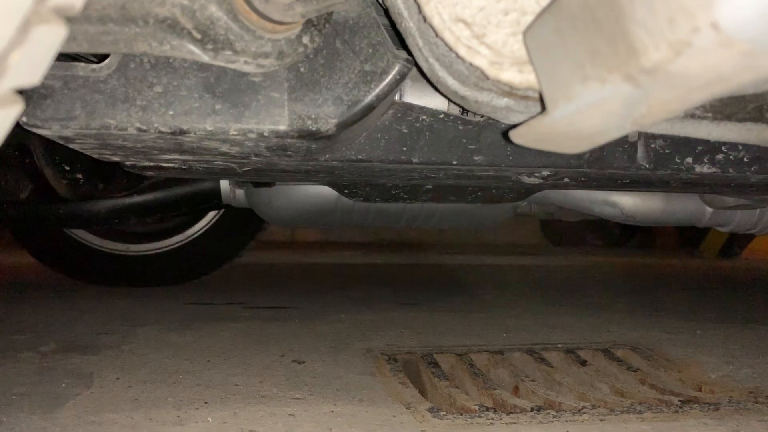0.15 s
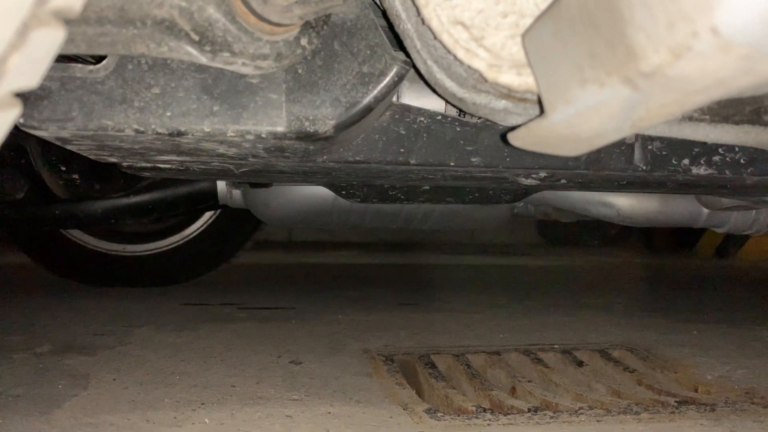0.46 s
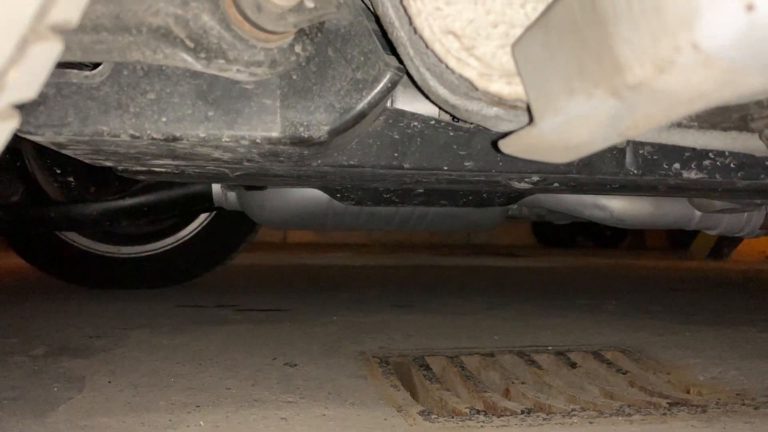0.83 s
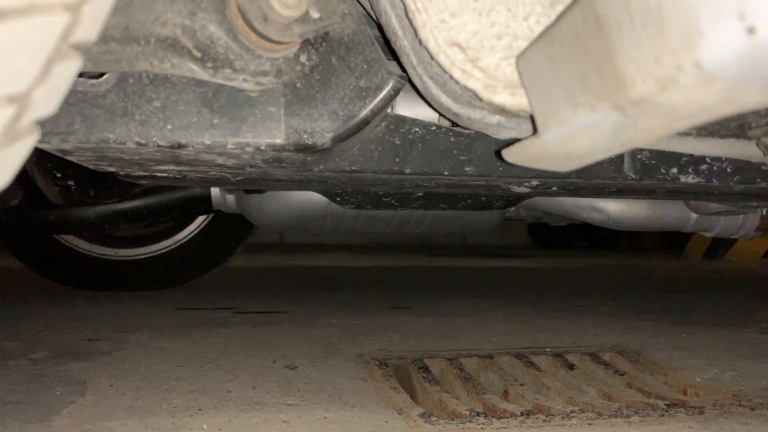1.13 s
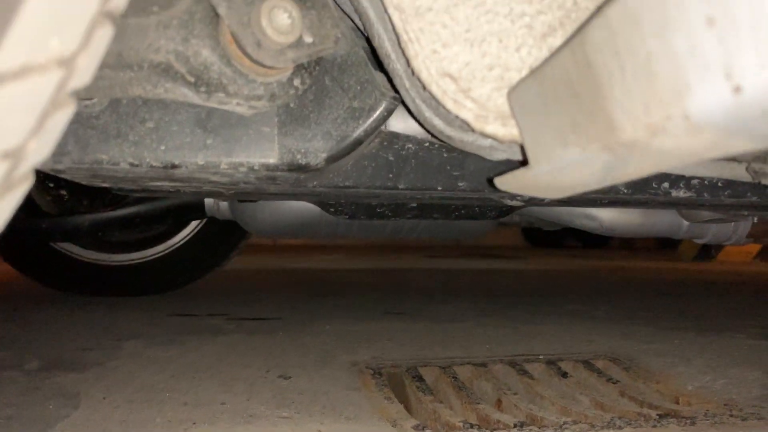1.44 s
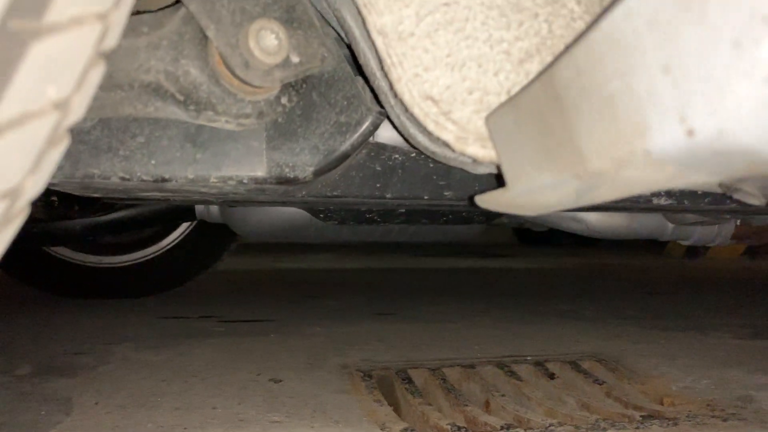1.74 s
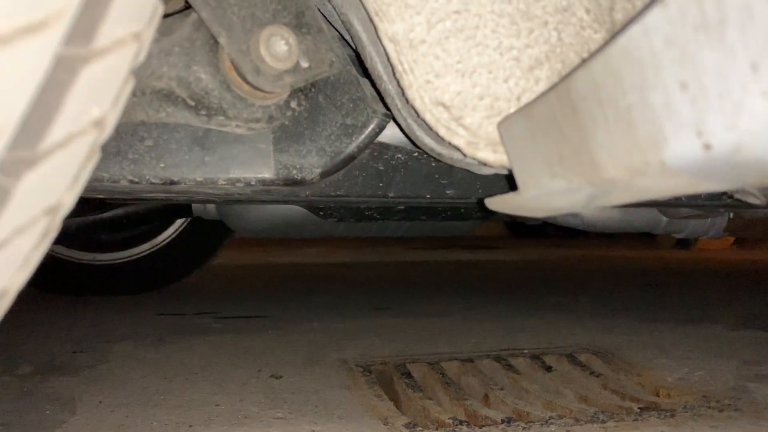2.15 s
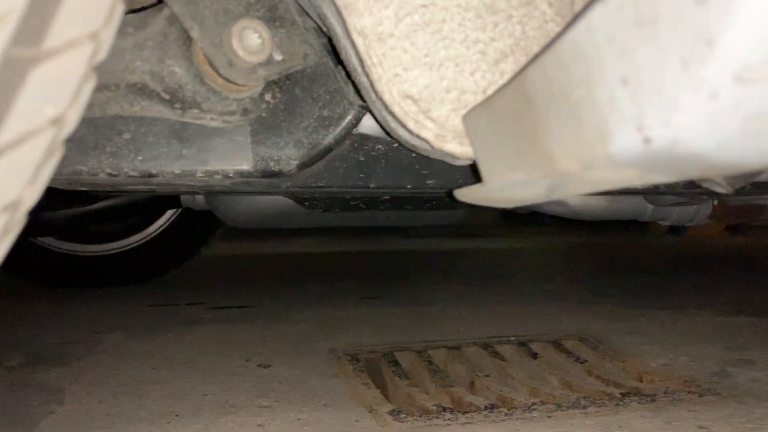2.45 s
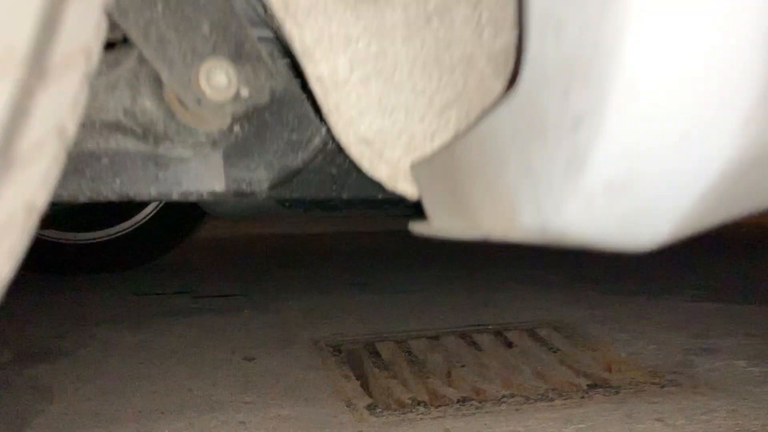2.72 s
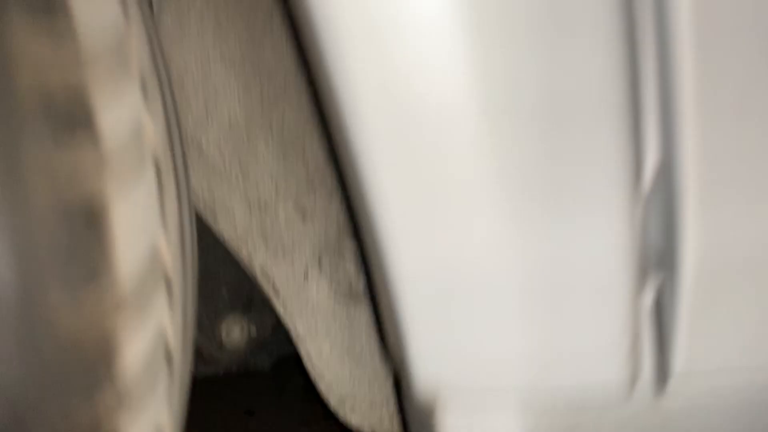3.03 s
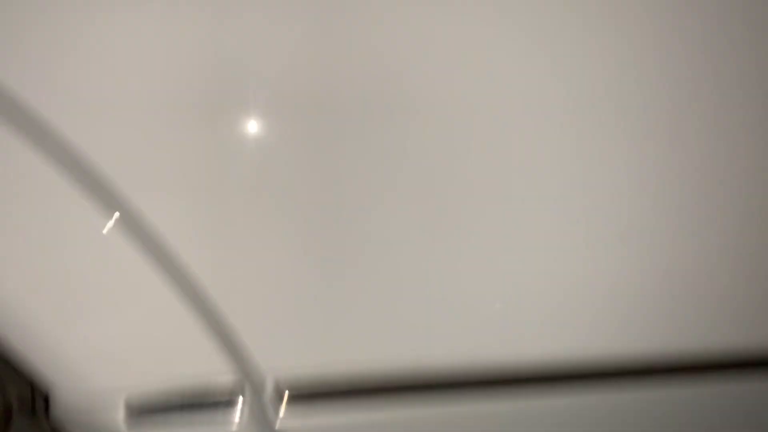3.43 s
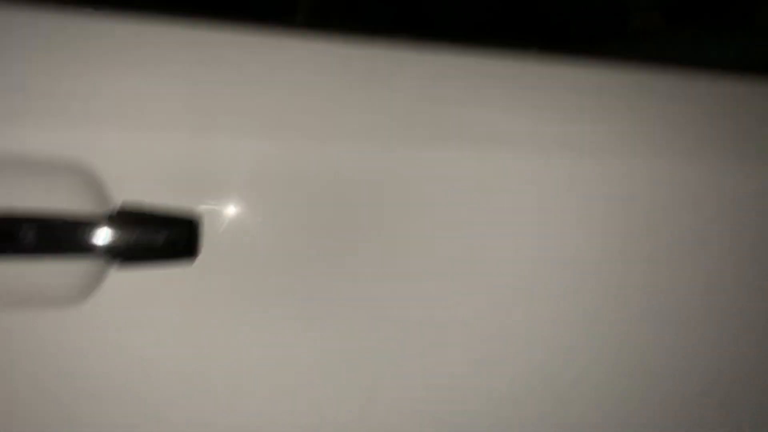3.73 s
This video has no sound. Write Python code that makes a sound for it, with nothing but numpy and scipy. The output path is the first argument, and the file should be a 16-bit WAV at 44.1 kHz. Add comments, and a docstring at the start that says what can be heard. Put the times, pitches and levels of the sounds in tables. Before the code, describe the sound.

A parked car's engine drones deep and steady with pump whine and hiss, dulling near the end

```python
"""In a garage a parked car runs, heard from the floor beside its wheel. A deep exhaust drone is a sum of low
engine orders; a small pump adds wavering whines, a hum and a housing ring that surges; a broad roar and
hiss are random short-time spectra. Near the end the microphone is lifted behind the body panel, which
shades hiss and pump; clothes rustle as lumpy noise, and something scuffs briefly in noise bands."""
import sys
import numpy as np
from scipy import signal
from scipy.fft import rfft, irfft
from scipy.io import wavfile
from scipy.ndimage import uniform_filter1d

SR = 44100
rng = np.random.default_rng(int(sys.argv[2]) if len(sys.argv) > 2 else 0)


def wrap_up_sound(samples):
    """Save the sound to the file named by the first command line argument, as 16-bit audio."""
    columns = np.atleast_2d(samples).T
    # keep every value between -1 and 1, then stretch to whole-number steps
    tamed = np.clip(columns, -1, 1)
    steps = np.round(tamed * 32767).astype(np.int16)
    wavfile.write(sys.argv[1], SR, steps)


def linear_from_db(decibels):
    """Turn decibels (scalar or array-like) into linear amplitude factors; 0 gives 1."""
    return 10 ** (np.asarray(decibels, float) / 20)


N = 171108
T = np.arange(N) / SR  # time axis [s]
# how far the body panel shades the microphone: (time [s], shade [1 = fully shaded])
PANEL_SHADE = [(0, 0), (1.5, 0.02), (2.5, 0.06), (2.8, 0.12), (3.08, 0.34), (3.3, 0.52), (3.42, 0.72),
               (3.6, 0.89), (3.88, 1.05)]


def evened(x):
    """Normalisation: scales to rms 1."""
    return x / np.sqrt(np.mean(abs(x) ** 2) + 1e-20)


def curve(points, t):
    """Linear interpolation between rows in time."""
    return np.interp(t, *np.transpose(points))


def read(points, hz):
    """Linear interpolation on a log-frequency axis."""
    f, value = np.transpose(points)
    return np.interp(np.log(hz + 1), np.log(f + 1), value)


def fuzzy(hz, width, n):
    """Narrow-band noise: complex noise through two equal poles, shifted up to hz; real part near rms 1."""
    r = np.exp(-np.pi * width / SR)  # each pole is width Hz wide
    z = rng.standard_normal(n + SR) + 1j * rng.standard_normal(n + SR)
    z = signal.lfilter([1], [1, -r], z)
    z = signal.lfilter([1], [1, -r], z)[SR:]  # the first second lets the poles settle
    return np.sqrt(2) * evened(z) * np.exp(2j * np.pi * hz * np.arange(n) / SR)


def placed(z, pan_db, lead):
    """Two-microphone localisation: a level difference, and a phase by which the left leads [rad]."""
    left = (z * np.exp(1j * lead)).real * linear_from_db(pan_db / 2)
    right = z.real * linear_from_db(-pan_db / 2)
    return np.array([left, right])


def drone():
    """Engine orders locked to one drifting phase; the strongest swells and sags in the garage."""
    # strongest order: (time [s], level [dB])
    main_level = [(0.0, -23), (0.05, -20.5), (0.17, -26.5), (0.32, -24), (0.42, -20.5), (0.62, -21),
                  (1.1, -19), (1.3, -20.5), (1.38, -24), (1.54, -23.5), (1.65, -20.5), (1.8, -20.5),
                  (2.11, -26.5), (2.45, -22.5), (2.52, -22.5), (2.63, -20.5), (2.72, -23.5), (2.96, -20.5),
                  (3.28, -19.5), (3.61, -21.5), (3.85, -20.5), (3.88, -20)]
    # its pitch drift: (time [s], frequency [Hz])
    main_pitch = [(0, 42.6), (.15, 42.26), (.23, 45.4), (.32, 43.7), (1, 43.17), (1.15, 42.57), (1.3, 43.3),
                  (1.45, 43.75), (1.6, 43.6), (1.95, 43.26), (2.2, 43.65), (2.75, 43.4), (2.95, 43.16),
                  (3.6, 42.76), (3.88, 42.6)]
    # other orders: (multiple of the drone pitch, level before the final factor of root 2 [dB])
    other_orders = [(2 / 3, -47), (4 / 3, -50)]
    waver_hz = 3.4  # pole width of the other orders' wavering
    phase = 2 * np.pi * np.cumsum(curve(main_pitch, T)) / SR
    out = linear_from_db(curve(main_level, T)) * np.exp(1j * (phase + 1.0))
    for multiple, db in other_orders:
        out = out + linear_from_db(db) * fuzzy(0, waver_hz, N) * np.exp(1j * multiple * phase)
    return placed(np.sqrt(2) * out, .2, 0.029)


def pump_whines():
    """Tones of partly steady pitch: a pure sinusoid and narrow-band noise share the power of each whine."""
    # (frequency [Hz], pole width [Hz], unshaded level [dB], left-right [dB], left lead [rad])
    whine_table = [(100, 1.5, -43, 0, -.4), (148, 2, -43.5, -1, -.2), (286, 24, -46, 1, -.3),
                   (436, 12, -46.5, 2, -.6), (861, 26, -51, -2, -1.2), (1125, 20, -53, -1, -1.5),
                   (1148, 14, -49, -1, -2.3), (1232, 32, -53, 0, -1.5), (1475, 6, -65, 3, -2.7),
                   (1685, 7, -64, 4, -2.9), (2740, 7, -55.5, 4, 3), (2950, 7, -63, 0, -2.7),
                   (5755, 8, -65, -1, 2.9), (7197, 14, -60, 0, 0), (14788, 14, -62, 0, -1.1)]
    steady = 0.9  # power share of the pure tone as the width nears zero
    shade_db = -3  # change at full shade
    out = 0
    for hz, width, db, pan, lead in whine_table:
        held = np.sqrt(2) * np.exp(2j * np.pi * (hz * T + rng.random()))
        share = steady / (1 + width / 4)
        tone = np.sqrt(share) * held + np.sqrt(1 - share) * fuzzy(hz, width, N)
        out = out + placed(linear_from_db(db) * tone, pan, lead)
    return out * linear_from_db(shade_db * curve(PANEL_SHADE, T))


def pump_hum():
    """Frequency and amplitude modulation: the pump's strongest hum drifts, swells and sags."""
    # (time [s], frequency [Hz], level [dB])
    hum_table = [(0, 195, -38.5), (.3, 195, -41), (.6, 196, -40), (.78, 196, -46), (1.049, 197, -48),
                 (1.149, 198.5, -42.5), (1.28, 198, -37.5), (1.42, 197, -48), (1.7, 197, -37),
                 (2.02, 196, -44.5), (2.201, 197, -39.5), (2.45, 197, -36.5), (2.701, 196, -43),
                 (2.951, 196, -42), (3.05, 195, -60), (3.88, 195, -50)]
    s, hz, db = np.transpose(hum_table)
    phase = 2 * np.pi * np.cumsum(np.interp(T, s, hz)) / SR
    hum = np.sqrt(2) * linear_from_db(np.interp(T, s, db)) * np.exp(1j * phase)
    return placed(hum, 0, -0.63)


def pump_housing():
    """Resonance: the housing rings softly all the time, and surges every few tenths of a second."""
    # constant ring: (frequency [Hz], pole width [Hz], unshaded level [dB])
    soft_rings = [(390, 10, -43), (404, 16, -42)]
    # surges: (start [s], length without edges [s], level before the surge gain [dB], frequency [Hz])
    surge_table = [(0.027, 0.073, -30.5, 398), (0.189, 0.038, -26, 398.2), (0.439, 0.024, -30, 391.5),
                   (0.704, 0.088, -29.5, 405.3), (0.825, 0.044, -27.5, 398), (1.063, 0.014, -28.5, 388),
                   (1.363, 0.014, -31.5, 393.9), (1.405, 0.059, -27.5, 399.6), (1.477, 0.048, -34, 393.4),
                   (1.559, 0.03, -34.5, 409), (1.679, 0.068, -29, 393), (1.996, 0.04, -31.5, 386.6),
                   (2.033, 0.056, -39, 399.4), (2.135, 0.049, -35, 405), (2.271, 0.023, -34.5, 399),
                   (2.323, 0.058, -26.5, 403.3), (2.524, 0.03, -35, 400), (2.628, 0.038, -24, 398),
                   (2.886, 0.037, -33, 404)]
    surge_gain_db, edge_s = -2.5, 0.017  # the edge lengthens a surge at both ends
    shade_db = -8.5  # change of the soft ring at full shade
    shade = np.maximum(curve(PANEL_SHADE, T), 0)
    ring = sum(linear_from_db(db) * fuzzy(hz, width, N) for hz, width, db in soft_rings)
    ring = ring * linear_from_db(shade_db * np.sqrt(shade))
    for start, length, db, hz in surge_table:
        progress = np.clip((T - start + edge_s) / (length + 2 * edge_s), 0, 1)
        swell = 2 * linear_from_db(db + surge_gain_db) * np.sin(np.pi * progress) ** 2
        ring = ring + swell * np.exp(2j * np.pi * (hz * T + rng.random()))
    return placed(ring, 5, 0.9)


def pump():
    """Superposition of the pump's whines, hum and housing ring."""
    return pump_whines() + pump_hum() + pump_housing()


def rustle():
    """Shaped noise, independent at each microphone, under one lumpy envelope as the microphone is lifted."""
    # relative spectrum: (frequency [Hz], density [dB per Hz])
    spectrum = [(700, -20), (1200, -1), (2500, -2), (5000, -5), (7300, -8), (9000, -9), (11000, -20)]
    # (start [s], loudest [s], end [s])
    moments = (3.07, 3.32, 3.48)
    level_db, lump_db = -40.5, 1.63  # level before envelope and lumps; rms depth of the lumps
    shaping = linear_from_db(read(spectrum, np.fft.rfftfreq(N, 1 / SR)))
    noise = irfft(rfft(rng.standard_normal((2, N))) * shaping, N)
    lumps = linear_from_db(lump_db * evened(uniform_filter1d(rng.standard_normal(N), size=600)))
    return linear_from_db(level_db) * evened(noise) * lumps * np.interp(T, moments, [0, 1, 0])


def scuff():
    """Friction noise: short rasps in a few broad bands, with a fast rise and an exponential decay."""
    # (start [s], length before the decay [s], level of each side's own rasp before its envelope [dB])
    rasps = [(3.649, 0.015, -37), (3.667, 0.007, -36.5)]
    # (frequency [Hz], pole width [Hz], relative level [dB])
    bands = [(750, 400, -10), (1250, 320, -3), (2100, 270, 0), (3300, 1200, -15), (4700, 900, -15),
             (7500, 2500, -17)]
    rise_s, decay_db_per_s, crossed = 0.0018, -3000, 0.92  # crossed: share heard at the other microphone
    out = np.zeros((2, N))
    for start, length, db in rasps:
        rise = np.clip((T - start) / rise_s, 0, 1)
        shape = rise * linear_from_db(np.clip(T - start - length, 0, 1) * decay_db_per_s)
        span = slice(round(start * SR), round((start + .08) * SR))
        n = span.stop - span.start
        for side in range(2):
            rasp = sum(linear_from_db(g) * fuzzy(hz, width, n) for hz, width, g in bands).real
            rasp = rasp / np.sqrt(np.mean(rasp[:round(length * SR)] ** 2))
            rasp = linear_from_db(db) * shape[span] * rasp
            out[side, span] += rasp
            out[1 - side, span] += crossed * rasp
    return out


def roar():
    """Short-time spectral synthesis: partly coherent noise that dulls as the panel comes between."""
    # the three spectra, before patches and gain: (frequency [Hz], density [dB per Hz])
    lowest = [(15, -80), (25, -79), (35, -68), (52, -60)]  # below both of the others
    open_spectrum = [(65, -48), (80, -63), (100, -58), (130, -59.5), (175, -57), (230, -64), (290, -60),
                     (350, -58), (480, -58.5), (535, -59.5), (580, -62.5), (615, -60), (645, -68.5),
                     (675, -62), (720, -74.5), (770, -64.5), (830, -65), (885, -63.5), (960, -71.5),
                     (1050, -67), (1120, -64.5), (1155, -66.5), (1195, -70.5), (1235, -63), (1280, -75.5),
                     (1400, -73.5), (1440, -74), (1500, -75.5), (1600, -72.5), (1850, -75.5), (2200, -70.5),
                     (2800, -72.5), (3200, -77.5), (4500, -76.5), (5800, -77), (7300, -73), (9000, -74),
                     (11000, -74), (13000, -71.5), (15500, -69.5)]  # open to the underside
    shaded_spectrum = [(65, -49), (100, -63.5), (130, -61), (230, -65.5), (290, -69.5), (350, -66.5),
                       (480, -68), (600, -66.5), (700, -71.5), (900, -69.5), (1050, -74), (1300, -76),
                       (1500, -78.5), (2200, -79), (3000, -84), (4500, -86.5), (5800, -86.5), (7300, -88),
                       (9000, -87), (11000, -89), (13000, -85.5), (15500, -84)]  # behind the panel
    # exponent on the shade, under 1 fades sooner: (frequency [Hz], exponent)
    shade_power = [(200, 1), (300, .55), (900, .55), (1100, 1.3), (1500, 1)]
    # likeness of the two microphones: (frequency [Hz], likeness [0-1])
    likeness = [(40, .995), (100, .95), (250, .82), (420, .6), (600, .45), (1100, .6), (1500, .45),
                (3000, .35), (4000, .2), (5500, .35), (6500, .5), (7000, .93), (7900, .93), (8800, .8),
                (9700, .95), (10900, .95), (12000, .85), (13200, .96), (14400, .97), (15500, .86)]
    # phase of their common part: (frequency [Hz], left lead [rad])
    left_lead = [(0, 0), (430, .27), (690, -1.2), (1120, -1.8), (1380, -2), (2840, -4.5), (3270, -3.6),
                 (4480, -6), (6030, -9.6), (6900, -12.3), (7900, -12.9), (9700, -15.35), (10900, -16.05),
                 (13100, -18.55), (14400, -19.15), (16000, -21.4)]
    # level difference: (frequency [Hz], left-right [dB])
    side_level = [(60, 1), (92, -9), (140, 1), (210, -0.5), (330, -1.5), (500, 3.5), (770, -1), (1170, 0.5),
                  (1790, 2.5), (2740, 2), (4190, 1.0), (6410, -3.5), (9810, 3.5), (15000, -1.5)]
    gain_db, flicker_db = 1, -0.05
    ripple_db, ripple_from_hz = 1.6, 1500
    # the roar is lumpier around the middle pitch
    patch_db, patch_mid_db, patch_mid_hz, patch_mid_octaves = 0.68, 1.7, 775, 1

    frames, hz = N // 512 + 5, np.fft.rfftfreq(2048, 1 / SR)
    a, b, c, d, patches = rng.standard_normal((frames, 1025, 5)).T
    t = np.arange(frames) * 512 / SR
    # arrays are (frequency, frame)
    patches = uniform_filter1d(patches, size=20, axis=0)
    patches = evened(uniform_filter1d(patches, size=8, axis=1))
    octaves = np.log2((hz + 1) / patch_mid_hz)
    lumpy_db = patch_db + patch_mid_db * np.exp(-(octaves / patch_mid_octaves) ** 2)

    shade = np.maximum(curve(PANEL_SHADE, t), 0) ** read(shade_power, hz)[:, None]
    db = read(lowest + open_spectrum, hz)[:, None] * (1 - shade)
    db = db + read(lowest + shaded_spectrum, hz)[:, None] * shade
    # reflections under the car colour the roar in narrow fixed bands
    ripple = evened(uniform_filter1d(rng.standard_normal(len(hz)), size=3))
    db = db + (ripple_db * ripple * (hz > ripple_from_hz))[:, None]
    db = db + lumpy_db[:, None] * patches

    same = np.clip(read(likeness, hz), 0, 1)[:, None]
    turn = np.exp(1j * np.interp(hz, *np.transpose(left_lead)))[:, None]
    right = a + 1j * b
    left = same * right * turn + np.sqrt(1 - same ** 2) * (c + 1j * d)
    pan = read(side_level, hz)[:, None] / 2
    z = np.array([left * linear_from_db(pan), right * linear_from_db(-pan)]) * linear_from_db(db)
    x = signal.istft(z * np.sqrt(SR / 2048), nperseg=2048, noverlap=1536)[1][:, :N]
    flicker = evened(uniform_filter1d(rng.standard_normal(N), size=400))
    return linear_from_db(gain_db + flicker_db * flicker) * x


def scene():
    """Superposition of everything under and around the car."""
    return drone() + pump() + rustle() + scuff() + roar()


def band_limit(x):
    """A steep low-pass at the top of the band."""
    return signal.sosfilt(signal.butter(12, 16370, fs=SR, output="sos"), x)


def record(dry):
    """Band limiting by a linear-phase low-pass filter."""
    edge = signal.firwin(511, 15760, window=("kaiser", 9), fs=SR)  # cutoff [Hz]
    mix = signal.oaconvolve(dry, edge[None], "same")
    return band_limit(mix)


dry = scene()
out = record(dry)
wrap_up_sound(out)
```